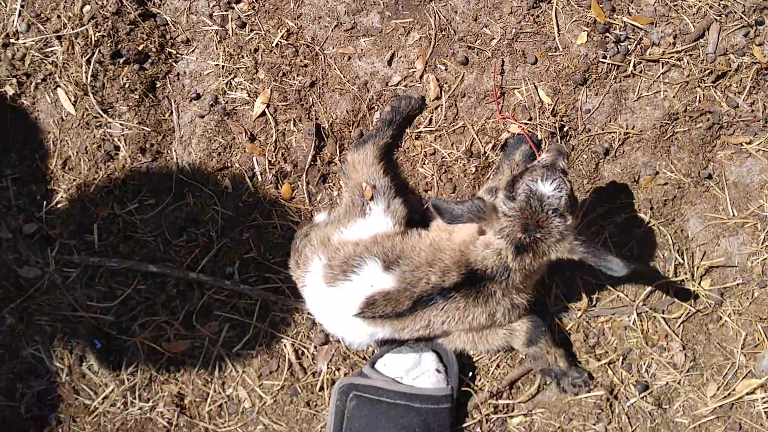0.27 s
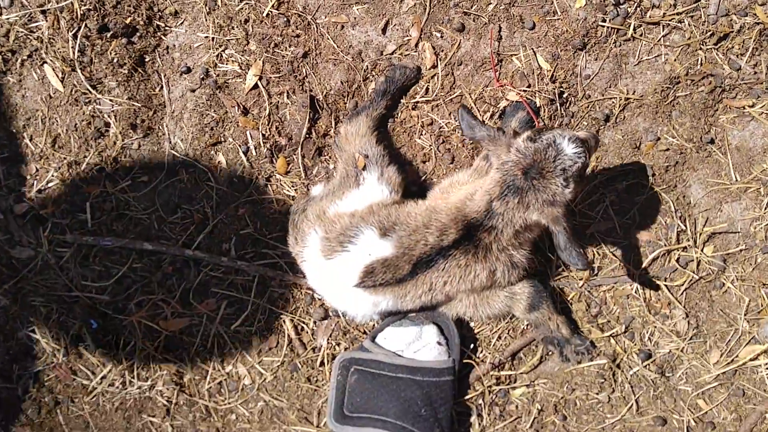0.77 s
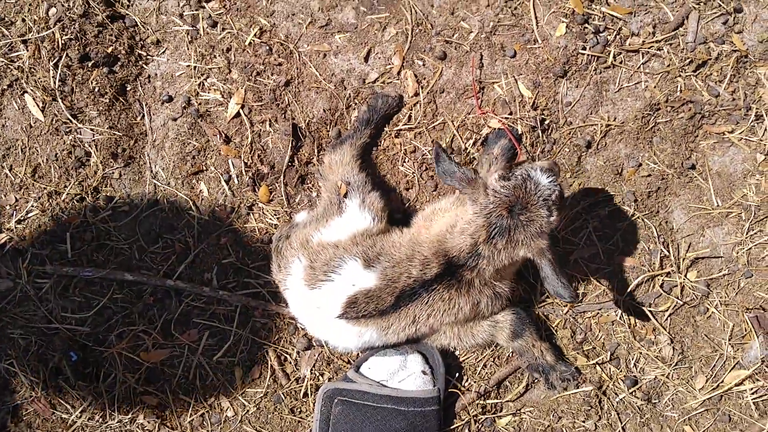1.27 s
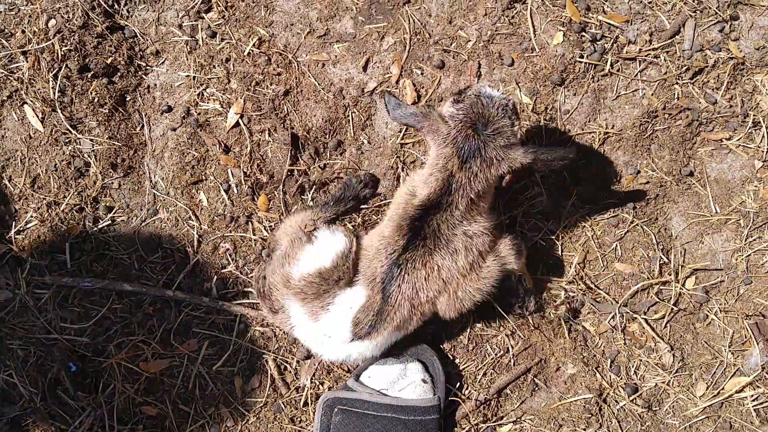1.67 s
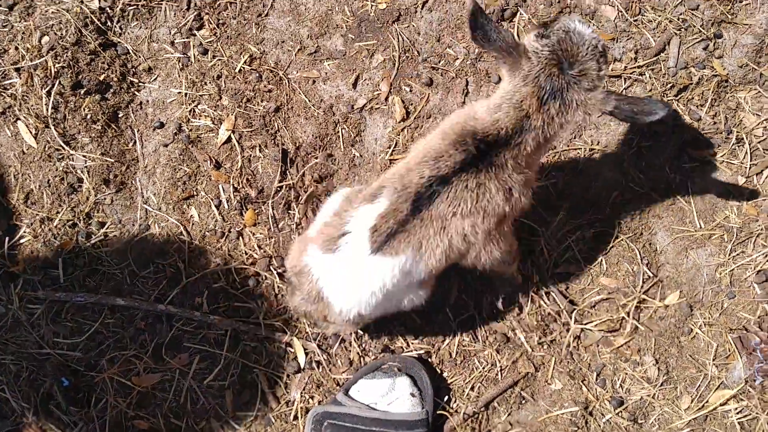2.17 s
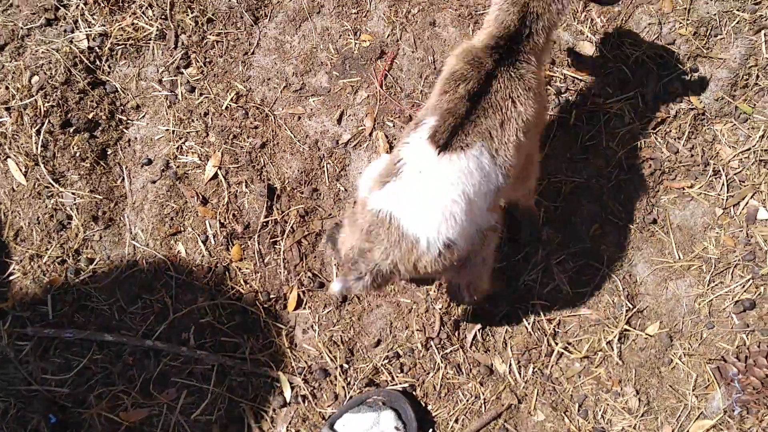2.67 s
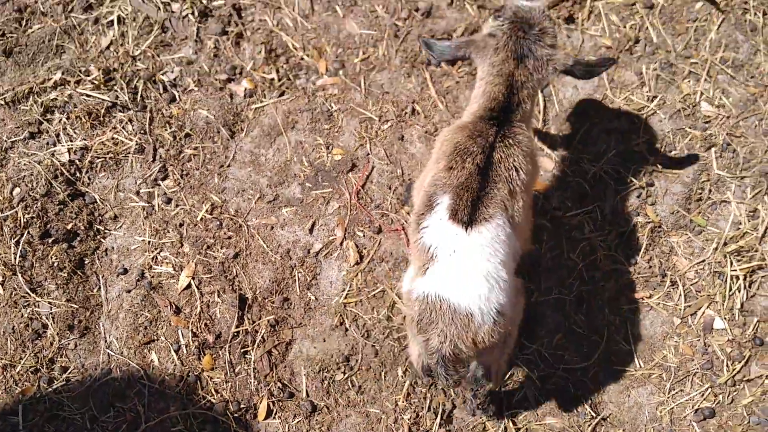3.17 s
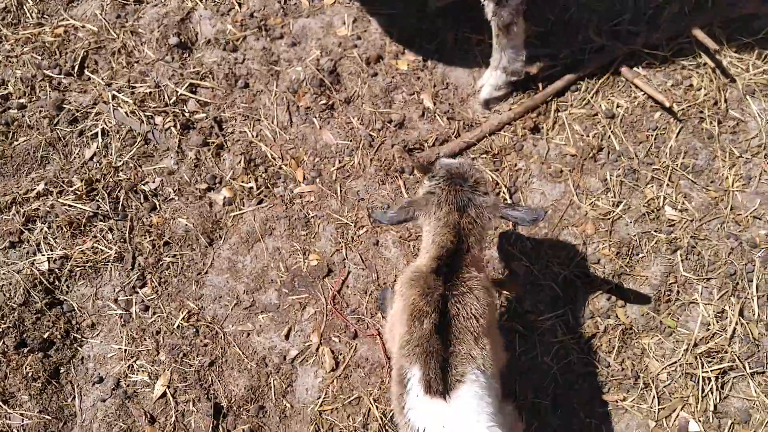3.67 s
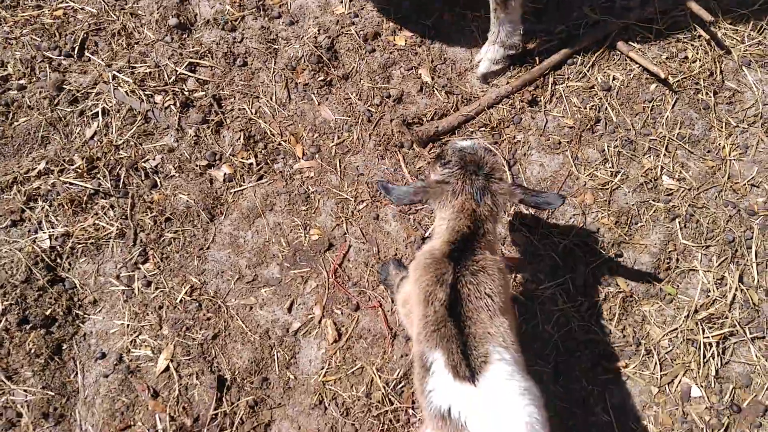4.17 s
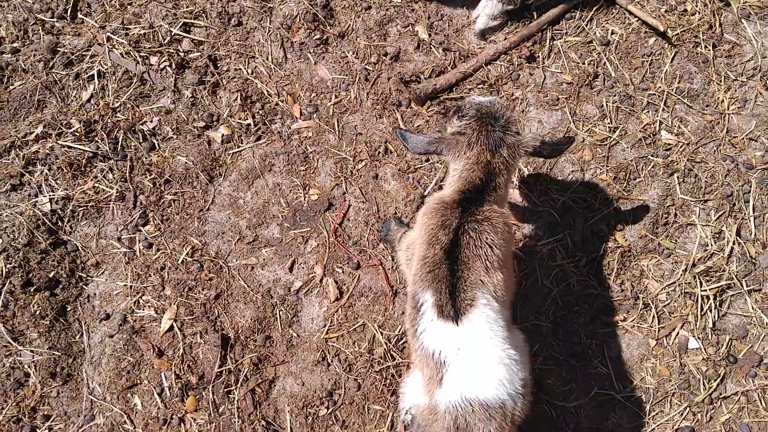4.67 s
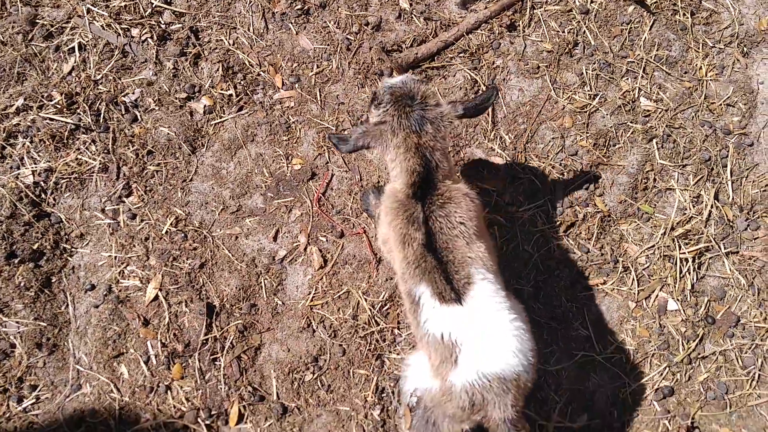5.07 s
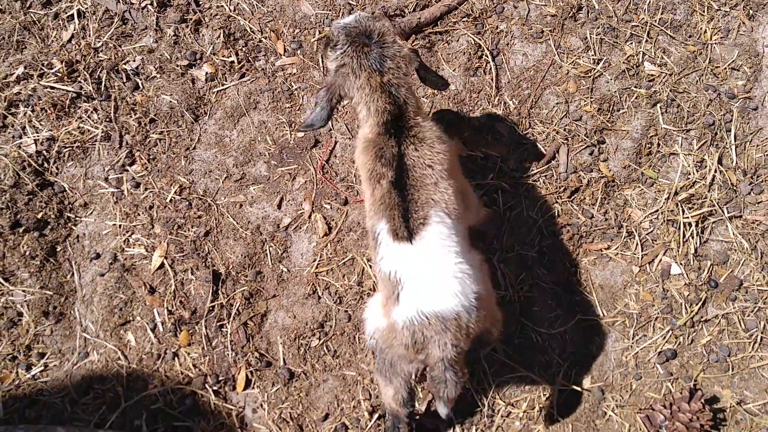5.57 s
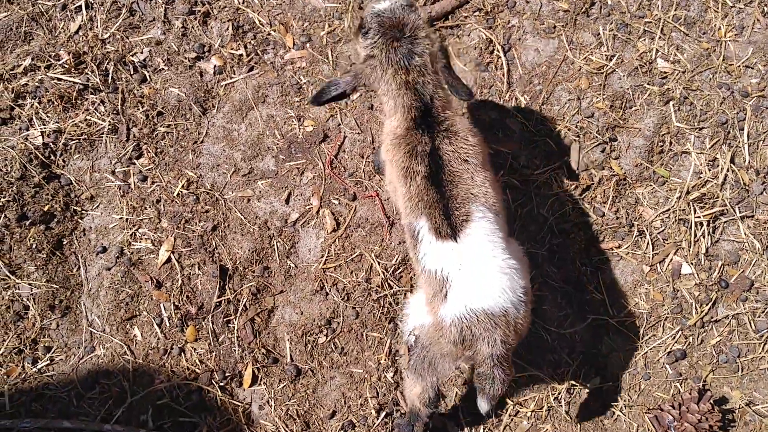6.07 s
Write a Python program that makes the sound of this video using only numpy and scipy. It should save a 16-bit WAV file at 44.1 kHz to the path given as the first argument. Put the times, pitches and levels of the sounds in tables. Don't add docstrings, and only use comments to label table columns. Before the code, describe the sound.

From 0 to 0.7 s a newborn goat kid bleats loudly close to the microphone: high, around 650 Hz, nasal and buzzy, with an early catch and sagging throbs, then a held tone that drops and frays into breath. Quiet open yard air follows, with distant rumble, low wind, small breeze puffs and thin insect hiss. From about 1.2 to 3.8 s a far bird repeats quick falling whistles. Between 1.5 and 3.8 s straw scrapes and rustles as the kid scrambles up, with dry twig snaps densest from 2 to 2.9 s; a low hen cluck comes at 2.7 s. A wind puff at 3.9 s leads into a short, much softer bleat at 4.0-4.2 s, turned away and broken by a catch. Sparse ticks continue to 4.9 s. A faint nasal wheeze and soft grunt come around 5 s, then a weak, higher hen cluck at 6.1 s. Faint outdoor reflections.

```python
import sys
import numpy as np
from scipy import signal
from scipy.fft import rfft, irfft, next_fast_len
from scipy.io import wavfile
from scipy.ndimage import uniform_filter1d

SR = 44100
rng = np.random.default_rng(int(sys.argv[2]) if len(sys.argv) > 2 else 0)


def generate_wav(signal):
    frames = np.transpose(np.atleast_2d(signal))
    scaled = np.clip(frames, -1, 1) * 32767
    pcm = np.round(scaled).astype(np.int16)
    wavfile.write(sys.argv[1], SR, pcm)


def volts_from_db(level):
    exponent = np.asarray(level, float) / 20
    return 10 ** exponent


N = 279153


def evened(x):
    return x / np.sqrt(np.mean(abs(x) ** 2) + 1e-20)


def smooth(x, size):
    return uniform_filter1d(uniform_filter1d(x, size=size), size=size)


def read(points, hz):
    f, value = np.transpose(points)
    return np.interp(np.log(hz + 1), np.log(f + 1), value)


def spectrum(points):
    return lambda hz: volts_from_db(read(points, hz))


def modes(table, hz):
    return [(-1) ** k * volts_from_db(db) / (1 + 2j * (hz - f) / w) for k, (f, w, db) in enumerate(table)]


def bands(table):
    return lambda hz: sum(abs(m) ** 2 for m in modes(table, hz))


def filtered(x, gain):
    size = next_fast_len(N)
    return irfft(rfft(x, size) * gain(np.fft.rfftfreq(size, 1 / SR)), size)[..., :N]


def hiss(gain, patchy_db, flicker_db):
    frames = N // 128 + 6
    a, b, patches = rng.standard_normal((3, 257, frames))
    patches = evened(uniform_filter1d(uniform_filter1d(patches, 6, 0), 20, 1))
    flicker = evened(uniform_filter1d(rng.standard_normal(frames), 3))
    z = (a + 1j * b) * volts_from_db(patchy_db * patches + flicker_db * flicker)
    x = signal.istft(z, nperseg=512, noverlap=384)[1][:N]
    return evened(filtered(x, gain))


def curve(rows):
    s, *columns = np.transpose(rows)
    t = np.arange(s[0], s[-1], 1 / SR)
    return s[0], [np.interp(t, s, c) for c in columns]


def level(s, hold, db, rise, fall):
    t = np.arange(0, N + 64, 64)[:, None] / SR
    rows_db = db - rise * np.maximum(s - t, 0) - fall * np.maximum(t - s - hold, 0)
    return np.interp(np.arange(N) / SR, t[:, 0], volts_from_db(rows_db.max(1)))


def swells(rows, edge_db):
    s, hold, db = np.transpose(rows)
    return level(s, hold, db, edge_db / hold, edge_db / hold)


def add(mix, s, sound):
    part = mix[round(s * SR):][:len(sound)]
    part += sound[:len(part)]


def throat_motion(rows, tone, fray_s):
    # (time [s], half width [s], dip [dB], pitch shift [Hz])
    catches = [
        (0.09, 0.016, -16, 59.5),
        (0.206, 0.03, -2, -19.5),
        (0.25, 0.03, -8, -14),
        (4.082, 0.024, -25, 52),
    ]
    # (knee [s], side, rate [Hz/s], softness [s])
    slides = [
        (0.018, -1, 1100, 0.0044),
        (0.64, 1, -3200, 0.011),
        (4.04, -1, -4300, 0.007),
    ]
    shut_hz, tight_hz, slack_s, let_go = 30, 20, 0.012, 1.6
    s, (effort_db, hz, jaw) = curve(rows)
    t = s + np.arange(len(hz)) / SR
    near = [c for c in catches if abs(c[0] - s) < 1]
    bumps = []
    for at, width, _, hz_up in near:
        side_width = np.where((t > at) & (hz_up > 0), let_go * width, width)
        bumps.append(np.exp(-((t - at) / side_width) ** 2))
    dip_db, shift = np.transpose(near)[2:] @ np.array(bumps)
    slide = sum(rate * soft * np.logaddexp(0, np.sign(side) * (t - knee) / soft)
                for knee, side, rate, soft in slides if abs(knee - s) < 1)
    under = np.maximum(-slide, 0)
    tight = np.tanh(np.maximum(shift, 0) / tight_hz)
    slack = 1 / (1 + np.exp((fray_s + slack_s - t) / slack_s))
    weights_db = np.array(tone) @ [t ** 0, tight, 1 - np.exp(-under / shut_hz), slack]
    fray = np.exp(np.minimum((t - fray_s) / .009, 3))
    breath = .065 + .45 * tight ** 2 + .008 * under + fray
    return s, [effort_db + dip_db, hz + shift + slide, jaw, *weights_db, breath]


def throat_gain(partial_hz, jaw, weights_db, throat, nasal):
    chest, low, mid = volts_from_db(weights_db)
    parts = modes(throat[:5], partial_hz / jaw)
    upper = -sum(modes(throat[5:], partial_hz)) / np.hypot(1, (5200 / partial_hz) ** 3)
    mouth = low * sum(parts[1:3]) + mid * sum(parts[3:]) + upper
    gain = chest * parts[0] + mouth / np.hypot(1, (1400 / partial_hz) ** 2)
    gain = gain * partial_hz ** 2 / (partial_hz ** 2 + 400. ** 2) * (partial_hz < 16000)
    return gain * volts_from_db(sum(db * np.exp(-((partial_hz - f) / w) ** 2) for f, w, db in nasal))


def voice(rows, tone, fray_s, throat, nasal, half_db, bounce_db, bounce_s):
    s, columns = throat_motion(rows, tone, fray_s)
    columns = uniform_filter1d(columns, size=260, mode="nearest")
    effort_db, hz, jaw, *_, breath = columns
    k = np.arange(1, 40)[:, None]
    step = np.arange(0, len(hz), 16)
    partial_hz = k * hz[step]
    gain = throat_gain(partial_hz, jaw[step], columns[3:6, step], throat, nasal)
    bounce = volts_from_db(bounce_db) / np.hypot(1, partial_hz / 7000) / np.hypot(1, (1500 / partial_hz) ** 2)
    gain = gain * (1 + bounce * np.exp(-2j * np.pi * partial_hz * bounce_s))
    gain = gain * volts_from_db(1.5 * evened(smooth(rng.standard_normal(gain.shape), 90)))
    gain = gain / np.sqrt((abs(gain) ** 2).sum(0) / 2)
    puff = smooth(rng.standard_normal((2, *gain.shape)), 4)
    share = np.clip(breath[step] * (partial_hz / 8000) ** 1.9, 0, 1)
    gain = gain * (np.sqrt(1 - share ** 2) + share * evened(puff[0] + 1j * puff[1]))
    jitter = evened(smooth(rng.standard_normal(len(hz)), 300))
    waver = .0008 + .006 * np.minimum(breath, 1) ** 2
    turns = np.cumsum(hz * (1 + waver * jitter)) / SR
    gain = signal.resample_poly(gain, 16, 1, axis=1, padtype="line")[:, :len(hz)]
    late = .03 * k ** 2
    x = (gain * np.exp(2j * np.pi * (k * turns - late))).real.sum(0)
    x = x * (1 + volts_from_db(half_db) * np.cos(np.pi * turns))
    flutter = volts_from_db(1.1 * np.minimum(breath, 1) * np.clip(jitter[::-1], -2, 2))
    return s, -flutter * volts_from_db(effort_db) * x * signal.windows.tukey(len(x), 400 / len(x))


def yard_hiss():
    # (frequency [Hz], density [dB per Hz])
    yard_points = [(60, -45), (120, -14.5), (165, -6.5), (300, -13.5), (400, -17.5), (510, -13.5),
                   (620, -13.5), (760, -11.5), (1290, -19), (2100, -23), (3800, -26.5), (8300, -27.5),
                   (9000, -31), (15800, -31.5)]
    return volts_from_db(-62.5) * hiss(spectrum(yard_points), 0.52, 0.97)


def low_gusts():
    # (time [s], hold [s], level [dB])
    gust_rows = [(.45, .06, -59), (.69, .1, -55.5), (1.36, 0.064, -57), (1.7, .12, -59.5),
                 (2.08, 0.097, -58.5), (2.8, 0.17, -61), (3.55, .2, -60.5), (5.51, 0.041, -56.5)]
    # (frequency [Hz], density [dB per Hz])
    gust_points = [(22, -46), (35, -18.5), (48, 1), (65, 0), (110, -2), (160, -12), (260, -32), (500, -68)]
    strength = np.maximum(volts_from_db(-62), swells(gust_rows, 6.5))
    return strength * hiss(spectrum(gust_points), 1.0, .6)


def insects():
    # (frequency [Hz], width [Hz], level [dB])
    insect_bands = [(6633, 160, -80.5), (7133, 450, -79), (8200, 500, -80.5)]
    hush = np.maximum(1 - np.arange(N) / SR / 1.2, 0)
    return volts_from_db(-74 - 3.5 * hush) * hiss(bands(insect_bands), 1.5, .6)


def breeze_puffs():
    # (time [s], hold [s], level [dB])
    puff_rows = [(.315, .012, -62.5), (.545, 0.0068, -60), (1.6, 0.074, -65), (2.52, 0.056, -65),
                 (3.885, .08, -56.5), (4.1, .015, -64), (4.255, 0.023, -62), (4.975, 0.021, -69)]
    # (frequency [Hz], density [dB per Hz])
    puff_points = [(90, -29), (180, -5), (320, 2.5), (500, -5), (800, 2), (1150, -9.5), (1800, -18),
                   (3000, -39.5)]
    return volts_from_db(4) * swells(puff_rows, 9) * hiss(spectrum(puff_points), 0.5, 0.94)


def whistle():
    # (time in phrase [s], length [s], from [Hz], to [Hz], level [dB])
    whistle_notes = [
        (0, .068, 4080, 3150, -1),
        (.068, .08, 2820, 1990, -1),
        (.148, .042, 1950, 1800, -5),
    ]
    notes = []
    for _, length, from_hz, to_hz, db in whistle_notes:
        u = np.arange(0, length, 1 / SR) / length
        hz = to_hz + (from_hz - to_hz) * (1 - u) ** 1.9
        notes.append([hz, db - 18 * abs(2 * u ** .8 - 1) ** 4])
    return np.hstack(notes)


def bird():
    # (time [s], level [dB])
    phrases = [(1.235, -75), (1.95, -77), (2.29, -77), (2.63, -71), (2.95, -68), (3.275, -72),
               (3.62, -73.5)]
    out = np.zeros(N)
    hz, db = whistle()
    for s, phrase_db in phrases:
        bend = rng.uniform(1.0, 1.02)
        fade_db = 3.5 * evened(smooth(rng.standard_normal(len(hz)), 500))
        tone = np.sin(2 * np.pi * np.cumsum(hz * bend) / SR)
        add(out, s, volts_from_db(db + phrase_db + fade_db) * tone)
    return out


def twigs():
    # (time [s], peak [dB], ring [Hz])
    snaps = [(1.2592, -61, 2280), (1.497, -55.5, 1950), (2.0156, -45.5, 3620), (2.018, -49, 6500),
             (2.0291, -49, 1940), (2.0539, -50, 1580), (2.138, -49, 7650), (2.1794, -42.5, 8460),
             (2.29, -55, 1880), (2.3995, -47, 4580), (2.411, -51.5, 1650), (2.5484, -51, 1990),
             (2.583, -50, 12500), (2.686, -48, 13400), (2.7244, -49, 3740), (2.739, -45.5, 3600),
             (2.879, -51, 12140), (3.1761, -51, 802), (3.3303, -51.5, 2310), (3.4067, -53.5, 1355),
             (3.7086, -47, 8410), (3.7365, -62, 6000), (4.316, -57.5, 10840), (4.6833, -56, 4500),
             (4.7277, -61, 3550), (4.7838, -56, 9000), (4.8549, -52, 3020)]
    out, t = np.zeros(N), np.arange(600) / SR
    for s, db, hz in snaps:
        burst = rng.standard_normal(600)
        ring = np.sin(2 * np.pi * hz * t) * volts_from_db(-60 * t * hz / 17.0)
        crack = signal.oaconvolve(burst * volts_from_db(-60 * t / 0.02), ring)[:600]
        tick = 0.071 * burst * volts_from_db(-60 * t / 0.0041)
        add(out, s, volts_from_db(db) * (crack / abs(crack).max() + tick))
    return out


def straw():
    # (start [s], hold [s], dull scrape [dB], bright rustle [dB])
    strokes = [(1.573, 0.11, -56.5, -66.5), (1.677, 0.1, -65, -61), (1.881, 0.083, -59.5, -73),
               (1.991, .13, -66, -71.5), (2.135, 0.12, -63, -61), (2.341, .11, -63.5, -66),
               (2.575, .18, -71, -67.5), (2.787, 0.15, -75, -64), (3.209, 0.024, -76, -75.5),
               (3.422, .06, -68, -83), (3.705, .035, -64, -60.5)]
    # (frequency [Hz], density [dB per Hz])
    scrape_points = [(600, -49), (1200, -4.5), (2300, 1), (3200, -1), (4000, -1.5), (6300, 0), (8500, -11),
                     (11000, -35)]
    # (frequency [Hz], density [dB per Hz])
    rustle_points = [(4000, -32), (6800, -9), (7900, 2), (8900, -7), (10600, 0.5), (12500, -6.5),
                     (15500, -5.5), (16500, -17)]
    rise, fall = 590, 310
    s, hold, *layers_db = np.transpose(strokes)
    stirring = level(s[:1], s[-1] - s[0], -81.5, rise, fall)
    out = np.zeros(N)
    for db, points in zip(layers_db, (scrape_points, rustle_points)):
        grains = volts_from_db(2.2 * np.minimum(rng.exponential(1, N), 5)) * (rng.random(N) < 900 / SR)
        clumps = 3.0 + evened(signal.oaconvolve(grains, np.exp(-np.arange(200) / 47.0))[:N])
        rubbing = evened(clumps * hiss(spectrum(points), 2.2, .8))
        out += (stirring + level(s, hold, db, rise, fall)) * rubbing
    return out


def cluck(row, partials_db):
    s, length, top_db, top_hz, scoop = row
    crest = .64
    u = np.arange(0, length, 1 / SR) / length
    before, after = np.maximum(1 - u / crest, 0), np.maximum(u - crest, 0)
    db = top_db - 28 * before ** 3 - 30 * (after / (1 - crest)) ** 2
    hz = top_hz * (1 - scoop * before ** (3 if scoop > 0 else 1)) - 700 * after * length
    turns = np.cumsum(hz) / SR
    x = sum(volts_from_db(p) * np.sin(2 * np.pi * (k + 1) * turns + k * k) for k, p in enumerate(partials_db))
    return s, volts_from_db(db) * evened(x)


def wheeze():
    # (frequency [Hz], width [Hz], level [dB])
    nose_bands = [(2404, 660, -4), (3600, 1000, -1.5), (6500, 2000, -5.5)]
    shut = np.clip((5.52 - np.arange(N) / SR) / .03, 0, 1)
    breath_out = level(s=4.975, hold=0.095, db=-61.5, rise=126, fall=31)
    return breath_out * shut * hiss(bands(nose_bands), 1.8, 1.05)


def echo(x, gap_s):
    # (frequency [Hz], time to fall 60 dB [s])
    echo_t60 = [(300, .35), (2000, .45), (4500, .36), (8000, .3), (15000, .17)]
    taps = np.zeros(SR // 2)
    at = np.arange(0, len(taps) - 20, 20)
    taps[at + rng.integers(0, 20, len(at))] = rng.choice([-1., 1.], len(at))
    hz, t, z = signal.stft(taps, SR, nperseg=256)
    tail = signal.istft(z * volts_from_db(-60 * t / read(echo_t60, hz)[:, None]), SR, nperseg=256)[1]
    tail = tail * (np.arange(len(tail)) > gap_s * SR)
    return signal.fftconvolve(x, tail / np.linalg.norm(tail))[:N]


def scene():
    # (time [s], effort [dB], held pitch [Hz], jaw factor on the throat)
    bleat_rows = [(0, -25, 645.3, 1.06), (0.05, -19, 648.8, 1.07), (0.162, -17, 658, 1.057),
                  (0.3, -15.5, 651.9, 1.044), (0.345, -16.5, 648.8, 1.06), (0.5, -15.5, 644.4, 1.06),
                  (0.63, -15, 628, 0.97), (0.686, -22.5, 624, 0.75), (0.712, -46, 640, 0.7)]
    # (time [s], effort [dB], held pitch [Hz], jaw factor on the throat)
    call_rows = [(3.975, -54, 641.7, 0.66), (4.005, -40.5, 639.4, 0.94), (4.03, -41.5, 639.8, 1.22),
                 (4.142, -31, 640, 1.01), (4.162, -28, 644, 0.97), (4.177, -30.5, 639.2, 1.1),
                 (4.205, -51.5, 636, 1.001), (4.23, -54, 636, 1.04), (4.27, -68.5, 647.7, 1.001)]
    # (held [dB], added in a catch [dB], mouth shut [dB], folds slack
    # [dB])
    bleat_tone = [
        (-9, -16.5, 21, 2.5),
        (-2, -16, 6.5, -7.5),
        (-3, -9.5, 5.5, -6.5),
    ]
    # (held [dB], added in a catch [dB], mouth shut [dB], folds slack [dB])
    call_tone = [
        (-1.04, -14, 12.5, 19),
        (0, -12, -18.5, 10),
        (-0.27, -28, -32, -1),
    ]
    # (frequency [Hz], width [Hz], level [dB])
    throat_near = [(1290, 520, -7), (2753, 440, 3.5), (3400, 1300, -4), (4500, 290, 7), (5700, 680, 0.5),
                   (8130, 360, 7), (10400, 910, -9), (11840, 900, -14.5), (13400, 1100, -26),
                   (14900, 2200, -23.5)]
    # (frequency [Hz], width [Hz], level [dB])
    throat_away = [(1006, 230, -8.5), (2070, 190, 2), (3170, 330, -5.5), (4500, 290, 3.5), (5660, 230, -1),
                   (7330, 930, 0), (10560, 700, 0), (11680, 760, -5), (15000, 830, -15.5)]
    # (frequency [Hz], half width [Hz], level [dB])
    nasal_near = [(660, 120, 5.5), (1976, 280, 9), (1965, 43, -15)]
    # (frequency [Hz], half width [Hz], level [dB])
    nasal_away = [(710, 120, 1.7), (2590, 650, 4)]
    cluck_rows = [
        ((2.666, .046, -43.5, 413, .08), [-42, -19.5, 2, -13, -10, -3.5, -18, -19.5, -20]),
        ((6.118, .044, -51, 1195, .16), [-28, -3, -18, -30]),
        ((5.1, .125, -64, 476, -.11), [-8, -3, 0, -8, -10, -1]),
    ]
    kid, fowl = np.zeros(N), bird()
    add(kid, *voice(bleat_rows, bleat_tone, .7, throat_near, nasal_near,
                    half_db=-33, bounce_db=-6.5, bounce_s=.002356))
    add(kid, *voice(call_rows, call_tone, 4.2, throat_away, nasal_away,
                    half_db=-38.5, bounce_db=-9.5, bounce_s=0.0037))
    for row, partials_db in cluck_rows:
        add(fowl, *cluck(row, partials_db))
    wet = echo(volts_from_db(-28.5) * kid + volts_from_db(-17.0) * fowl, gap_s=0.016)
    air = yard_hiss() + low_gusts() + insects() + breeze_puffs() + wheeze()
    mix = kid + fowl + wet + twigs() + straw() + air
    return np.array([mix, mix])


def top_cut(x):
    return signal.sosfilt(signal.butter(12, 15960, fs=SR, output="sos"), x)


def record(dry):
    # (centre [Hz], width [Hz], depth [dB])
    case_dip = (510, 59, -13)
    centre_hz, width_hz, dip_db = case_dip
    heard = filtered(dry, lambda hz: volts_from_db(dip_db * np.exp(-((hz - centre_hz) / width_hz) ** 2)))
    return top_cut(heard)


dry = scene()
out = record(dry)
generate_wav(out)
```